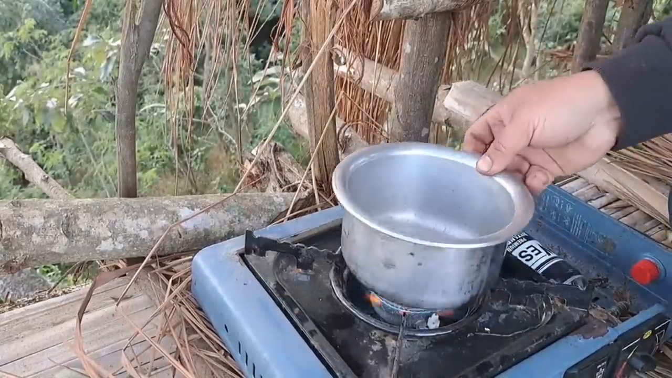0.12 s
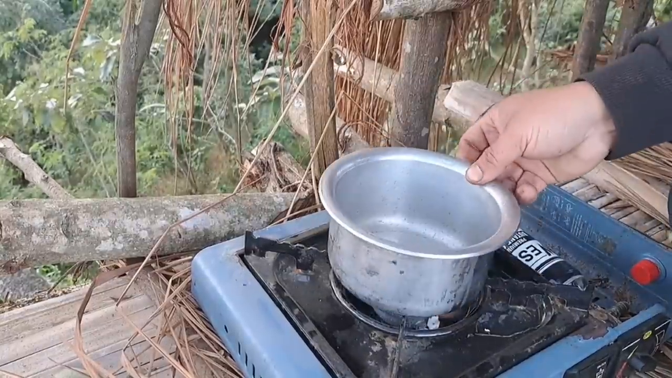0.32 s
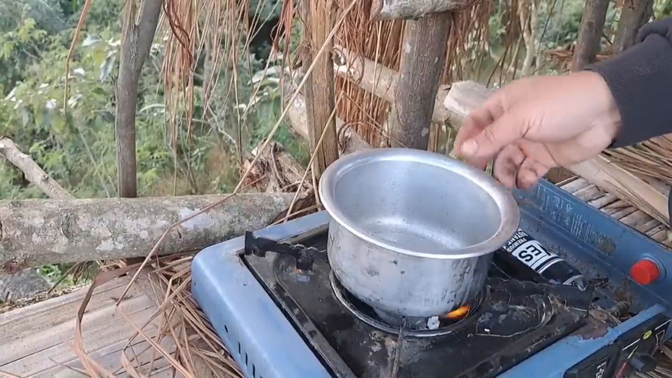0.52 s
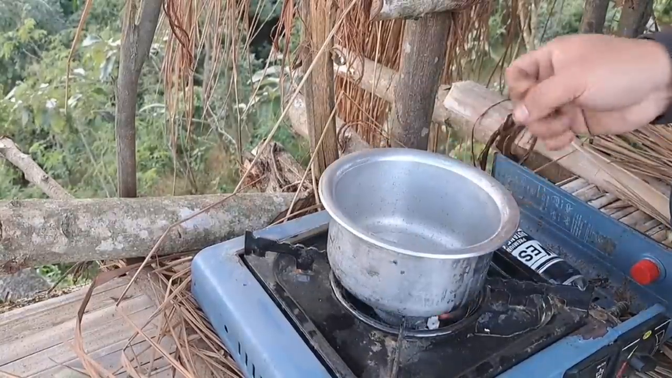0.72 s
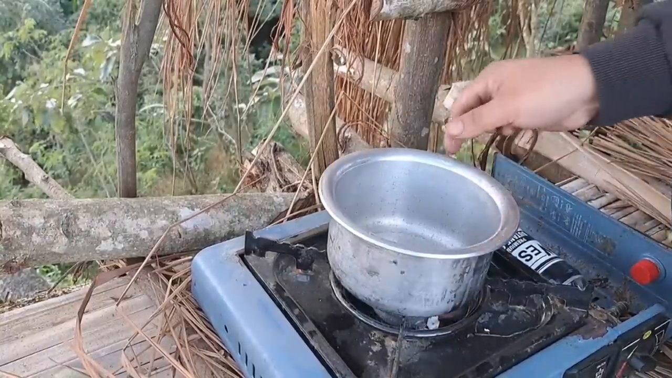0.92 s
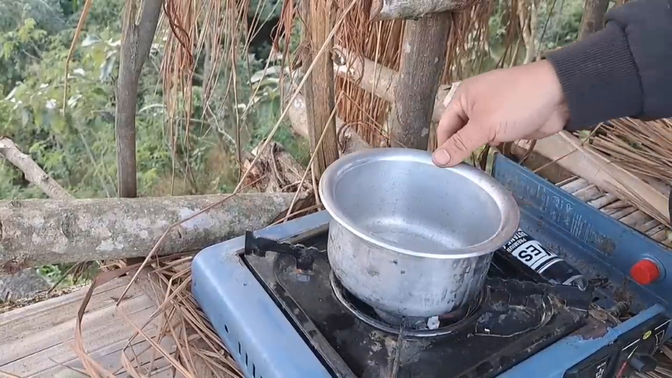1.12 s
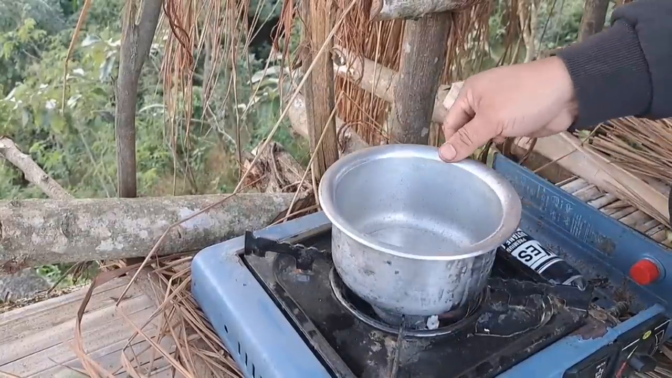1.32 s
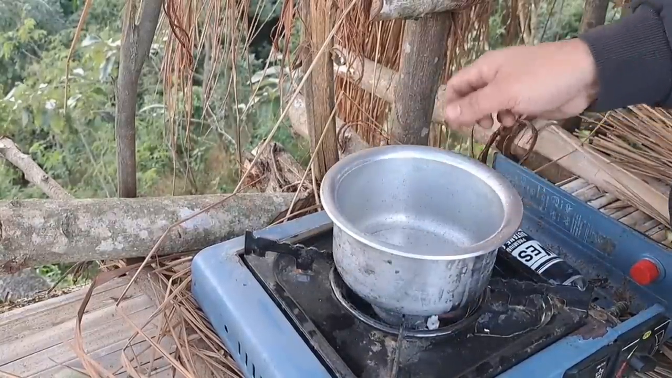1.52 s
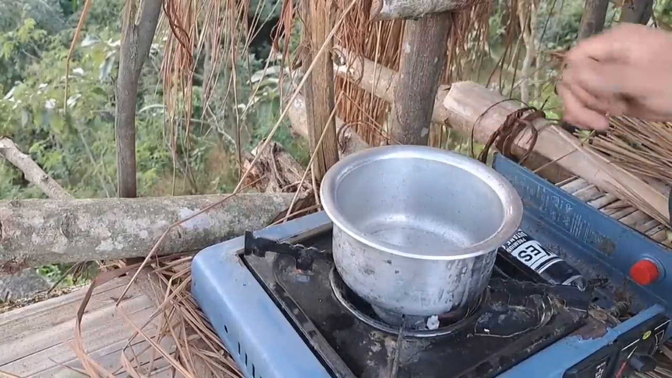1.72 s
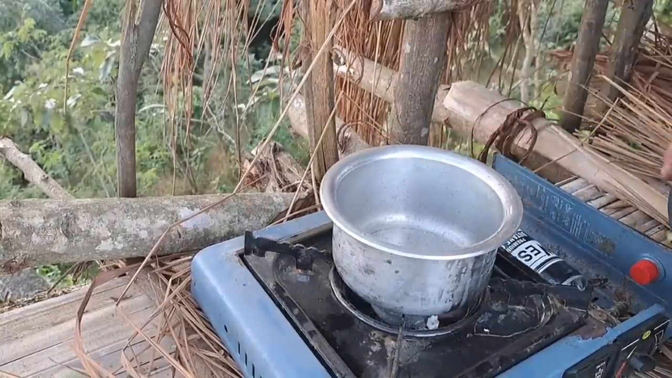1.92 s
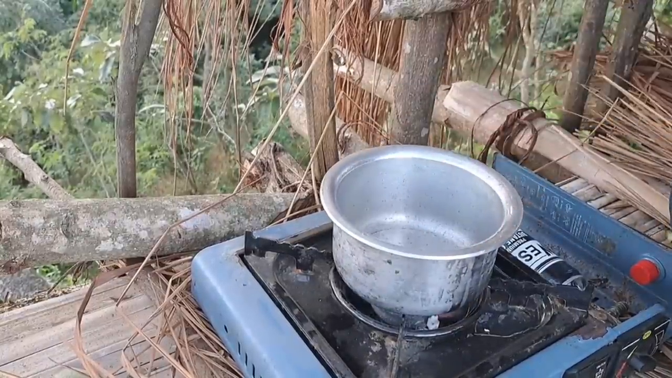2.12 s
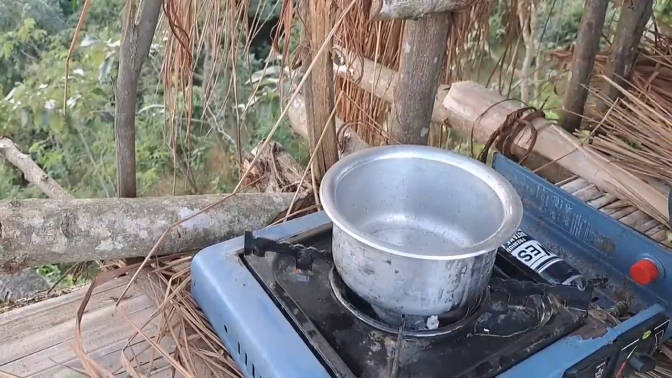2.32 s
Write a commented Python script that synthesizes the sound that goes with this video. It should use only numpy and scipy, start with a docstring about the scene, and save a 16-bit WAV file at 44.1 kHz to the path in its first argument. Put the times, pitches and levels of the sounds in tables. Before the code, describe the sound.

Thin metal pot clanks and scrapes on a gas stove grate over a low fluttering flame

```python
"""A lit gas stove flutters and hisses, then a thin aluminium pot clanks and scrapes on its grate close by.
The pot is nudged again and drops into its seat; a soft, airy rustle passes as the arm draws away.
Knocks ring decaying modes over bursts of coloured noise; scrapes are rough noise plus slips ringing the pot.
The flame is low noise and sputter under one flutter, the gas jet steady noise.
The rustle is swelling noise with thin arching whistles."""
import sys
import numpy as np
from scipy import signal
from scipy.fft import rfft, irfft
from scipy.io import wavfile
from scipy.ndimage import uniform_filter1d

SR = 44100
rng = np.random.default_rng(int(sys.argv[2]) if len(sys.argv) > 2 else 0)


def wrap_up_sound(samples):
    """Save the sound to the file named by the first command line argument, as 16-bit audio."""
    columns = np.atleast_2d(samples).T
    # keep every value between -1 and 1, then stretch to whole-number steps
    tamed = np.clip(columns, -1, 1)
    steps = np.round(tamed * 32767).astype(np.int16)
    wavfile.write(sys.argv[1], SR, steps)


N = 110250  # samples, 2.5 s


def undb(db):
    """Decibels to gain."""
    return 10 ** (np.asarray(db) / 20)


def unit(x):
    """Scale to rms 1."""
    return x / np.sqrt(np.mean(x ** 2))


def response(points):
    """Causal (minimum-phase) filter through (Hz, dB) points that keeps the power of white noise."""
    hz, db = np.array(points).T
    f = np.maximum(np.arange(N // 2 + 1) * SR / N, 1)
    gain = unit(undb(np.interp(np.log(f), np.log(hz), db)))
    # folding the cepstrum onto positive time makes the filter causal
    cepstrum = irfft(np.log(gain), N)
    cepstrum[1:N // 2] *= 2
    cepstrum[N // 2 + 1:] = 0
    return np.exp(rfft(cepstrum))


def colour(x, points):
    """Shape a sound's spectrum with the points."""
    return irfft(rfft(x) * response(points), N)


def pan(db):
    """Left and right gains for a left-minus-right level."""
    return undb(np.array([[db], [-db]]) / 2)


def noise(side_db):
    """Stereo white noise; side_db 0 makes the channels unrelated."""
    mid, side = rng.standard_normal((2, N))
    return mid + undb(side_db) * side * np.array([[1], [-1]])


def band_pass(low_high_hz):
    """Second-order Butterworth band."""
    return signal.butter(2, low_high_hz, "band", fs=SR, output="sos")


def walk(hz):
    """Smooth random motion with rms 1; higher hz moves faster."""
    k = max(int(SR / hz), 2)
    smooth = uniform_filter1d(rng.standard_normal(N), k)
    return unit(uniform_filter1d(smooth, k))


def curve(rows):
    """Gain along (s, dB) points."""
    s, db = np.array(rows).T
    return undb(np.interp(np.arange(N) / SR, s, db))


def fade(t, t60):
    """Free decay, falling 60 dB in t60 seconds."""
    return np.exp(-np.log(1000) * t / t60)


def add(out, x, s):
    """Mix x in from time s."""
    i = int(s * SR)
    n = min(x.shape[-1], N - i)
    out[..., i:i + n] += x[..., :n]


# Pot meets grate. Each row: start in seconds, level in dB, treble in dB, thud of the stove body in dB,
# seat from 0 tilted to 1 seated, chatter as the strength ratio of successive contacts (0-1),
# ring time as a share of the free ring. The dB are relative to the layer levels below.
POT_KNOCKS = [(.2127, -7, -3, 6.5, 0.74, 0.88, 0.9), (.229, -7, -1.5, 1, 0.7, 0.5, 0.85),
              (0.284, -22, -5, 1.5, 0.093, .7, 1.1), (0.3129, -14.5, -19.5, 2.5, 0.073, 0.87, 1.2),
              (.3358, -2, 1, -1, 0, 0.63, 0.43), (.341, -4, 4.5, -12, .2, .4, .65),
              (.3753, 1.5, -1.5, -0.5, 0.075, 1, 0.55), (.3826, -9, 6, 2, 0.36, .5, 1.2),
              (.4038, -4.5, -8, 10, 0, .6, 0.58), (.4100, -8, 1, -17, 0.17, 0.6, 0.85),
              (0.4183, -6, -7.5, 2, 0.49, 0.47, 0.48), (1.5114, -4.5, 0.5, -10.5, 1, 0.5, 0.73),
              (1.5158, -5.5, 4.5, -6, 1, .8, 0.85), (1.5311, -16, 8.5, 6, 0.64, 1, 1.06),
              (1.5394, -13, 1.5, -6, 1, 0.1, 0.37), (1.583, -11.5, -9.5, 1, 0.61, 0.6, 0.57)]
# Dense clatter of grate and stove top. Each row: frequency in Hz, relative level in dB per Hz.
CLATTER_COLOUR = [(150, -28), (400, -13.5), (720, -3.5), (950, -5), (1200, 0), (1500, -1), (2000, -3.5),
                  (2220, -11), (2650, -8), (3400, -14), (3900, -21), (4200, -15), (4700, -24),
                  (6500, -26.5), (8000, -27.5), (9200, -37.5), (12000, -29.5), (16000, -39)]
# Thud of the stove body. Each row: frequency in Hz, relative level in dB per Hz.
THUD_COLOUR = [(30, -16), (70, -6), (130, 0), (250, 5), (380, 6.5), (600, 0.5), (1000, -36), (3000, -57)]
RING_DB, CLATTER_DB, CRACK_DB, THUD_DB, SHIMMER_DB = -25.5, -22.5, -5.5, -38, -61.5
CLATTER_T60_S, SHIMMER_T60_S = 0.11, 0.14  # before each knock's ring share
THUD_T60_S, CHATTER_S = 0.16, 0.0035  # thud decay, mean gap between contacts
TREBLE_HZ = 3000  # where the treble tilt of knocks and ring turns over
POT_WIDTH_DB = -7.5  # side level of the clatter


def knocks():
    """Each blow chatters in four quick contacts, rings the pot, rattles the grate and thuds in the stove body."""
    t = np.arange(SR // 4) / SR
    ring, clatter, thud = np.zeros((3, 2, N))
    wall = shimmer(t)
    split = signal.butter(1, TREBLE_HZ, fs=SR, output="sos")
    for s, db, treble_db, thud_db, seat, chatter, share in POT_KNOCKS:
        add(ring, pot_ring(t, seat, treble_db, share) * undb(db + RING_DB), s)
        wall_ring = wall * fade(t, SHIMMER_T60_S * share)
        add(ring, wall_ring * undb(db + treble_db + SHIMMER_DB), s)

        rattle = noise(POT_WIDTH_DB)[:, :len(t)] * fade(t, CLATTER_T60_S * share) * undb(CLATTER_DB)
        # each contact is a one-sample crack, weaker by the chatter ratio every time
        for k, jitter in enumerate(rng.uniform(-1, 1, size=4)):
            contact_s = k * CHATTER_S * (1 + .06 * jitter)
            rattle[:, int(contact_s * SR)] -= undb(CRACK_DB) * chatter ** k
        low = signal.sosfilt(split, rattle)
        high = rattle - low
        add(clatter, undb(db) * (low + undb(treble_db) * high), s)

        boom = noise(-24)[:, :len(t)] * fade(t, THUD_T60_S)
        add(thud, boom * undb(db + thud_db + THUD_DB), s)
    return ring + colour(clatter, CLATTER_COLOUR) + colour(thud, THUD_COLOUR)


# Rings of the pot. Each row: frequency in Hz, level in dB when tilted, level in dB when seated,
# t60 in seconds of the free ring.
RING_MODES = [(678, -9, -13, .17), (790, -10, -6, .13), (845, -11, -18, .13), (1105, -4, -13, .15),
              (1200, -7, -5, .13), (1398, -6, -11, .13), (1438, -3, 1, .16), (1588, -2, -3, .16),
              (1642, -4, -14, .14), (1825, -4, -9, .15), (1887, -14, -4, .12), (2036, -3, -16, .15),
              (2090, -5, -5, .16), (2312, -16, -9, .1), (2400, -8, -14, .14), (2610, -14, -10, .13),
              (3040, -9, -16, .15), (3300, -13, -13, .16), (3520, -17, -6, .13), (3682, -17, -16, .13),
              (4150, -14, -20, .1), (5328, -24, -16, .16), (6530, -32, -22, .09), (6840, -32, -21, .08)]
RING_BUILD_S, MODE_WIDTH = 0.0015, 0.6  # onset t60, side gain of the modes


def pot_ring(t, seat, treble_db, share):
    """The pot's modes after a contact; seat sets their balance, share their decay, and high ones spread wider."""
    hz, tilted_db, seated_db, t60 = np.array(RING_MODES).T[:, :, None]
    tilt_db = treble_db * hz ** 2 / (hz ** 2 + TREBLE_HZ ** 2)
    gains = undb(tilted_db + seat * (seated_db - tilted_db) + tilt_db)
    opposite = (-1.) ** np.arange(len(hz))[:, None]  # neighbouring modes move in opposite senses
    swing = opposite * gains * fade(t, t60 * share)
    mid = (swing * np.sin(2 * np.pi * hz * t)).sum(0)
    side_phase = 2 * np.pi * (hz * t + rng.random(hz.shape))
    side = MODE_WIDTH * (swing * np.minimum(hz / TREBLE_HZ, 2) * np.sin(side_phase)).sum(0)
    return np.array([mid + side, mid - side]) * (1 - fade(t, RING_BUILD_S))


SHIMMER_HZ, SHIMMER_SPREAD_DB = (4200, 14530), 8.5  # range of the partials, spread of their levels


def shimmer(t, count=70):
    """Faint high partials of the thin wall, each with its own strength at either ear."""
    hz = rng.uniform(*SHIMMER_HZ, size=(count, 1))
    spread = undb(SHIMMER_SPREAD_DB * rng.standard_normal((2, count, 1)))
    gains = spread * SHIMMER_HZ[0] / hz
    phase = 2 * np.pi * (hz * t + rng.random((2, count, 1)))
    return (gains * np.sin(phase)).sum(1)


# The base slides on the grate. Each row: start in seconds, loudest moment in seconds, end in seconds,
# level in dB at the loudest moment.
GRATE_SCRAPES = [(0.237, 0.292, 0.344, -45.5), (0.445, 0.566, 0.62, -67.5), (1.3, 1.438, 2.14, -63),
                 (1.448, 1.476, 1.509, -50)]
# Grit of the rub. Each row: frequency in Hz, relative level in dB per Hz.
GRIT_COLOUR = [(300, -19.5), (700, 7), (1400, -1.5), (2400, -15), (3300, -2), (4000, -5), (5400, -9),
               (7500, -14), (9200, -22), (12500, -8.5), (16000, -20.5)]
SCRAPE_ROUGH_DB, SCRAPE_RING_DB, SLIPS_PER_S = 2, -6.5, 650


def scrapes():
    """The base sticks and slips over the grate: a gritty rub whose slips ring the pot."""
    t = np.arange(N) / SR
    push = np.zeros(N)
    for start, top, end, db in GRATE_SCRAPES:
        push += undb(db) * np.interp(t, [start, top, end], [0, 1, 0])
    rough = unit(undb(SCRAPE_ROUGH_DB * walk(350)))
    grit = colour(noise(-5) * push * rough, GRIT_COLOUR)

    happens = rng.random(N) < SLIPS_PER_S / SR
    slips = unit(happens * rng.standard_normal(N)) * push
    body = pot_ring(t[:SR // 4], seat=0, treble_db=8, share=.6)
    body = body / np.linalg.norm(body[0])
    rung = signal.fftconvolve(slips[None], body)[:, :N]
    return grit + undb(SCRAPE_RING_DB) * rung


# Dull bumps, taps and ticks of the pot and stove. Each row: start in seconds, level in dB, pitch in Hz,
# width in octaves, t60 in seconds.
LIGHT_TAPS = [(0.256, -43.5, 74.4, .6, 0.14), (0.505, -43.5, 955, 0.63, 0.077),
              (1.221, -53.5, 6540, 0.46, 0.029), (1.223, -51, 58, .7, 0.18), (1.232, -54, 956, 0.68, 0.14),
              (1.371, -52, 1094, 0.58, 0.14), (1.476, -44, 860, 2.1, 0.034), (1.626, -50, 73.3, .6, 0.17),
              (1.981, -49, 4670, .08, .04), (2.379, -38, 353, 0.78, 0.027), (2.377, -55, 1200, 0.31, 0.017)]


def taps():
    """Light touches: one short burst of band-limited noise each."""
    t, out = np.arange(N) / SR, np.zeros((2, N))
    for s, db, hz, octaves, t60 in LIGHT_TAPS:
        band = band_pass(hz * 2 ** (np.array([-.5, .5]) * octaves))
        burst = unit(signal.sosfilt(band, noise(-10)))
        envelope = fade(t, t60) * (1 - fade(t, 0.001))
        add(out, burst * envelope * undb(db), s)
    return out


# Strength of the flame. Each row: time in seconds, level in dB.
FLAME_STRENGTH = [(0, -64.5), (.13, -63.5), (.17, -52.5), (.45, -46.5), (.53, -52.5), (.63, -57.5),
                  (.68, -54), (1.1, -51.5), (1.35, -54), (1.6, -50.5), (1.72, -56.5), (1.85, -53.5),
                  (2.12, -51), (2.21, -54.5), (2.3, -50), (2.5, -57)]
# Low roar of the flame. Each row: frequency in Hz, relative level in dB per Hz.
ROAR_COLOUR = [(25, -34.5), (50, -12.5), (90, -12), (140, 0.5), (250, 1), (350, -4.5), (560, -5.5),
               (670, -13.5), (790, -45.5), (2000, -40)]
# Faint sputter of the flame. Each row: frequency in Hz, relative level in dB per Hz.
SPUTTER_COLOUR = [(500, -17.5), (800, -5), (1000, -2), (1450, 0), (2200, -13), (2700, -6.5), (3300, -3),
                  (3900, -20.5), (5000, -16), (9000, -19.5)]
FLUTTER_HZ, FLUTTER_DB = (22.6, 160), 2.5  # flutter band, its depth on the roar
SPUTTER_DB, SPUTTER_FLUTTER_DB, SPUTTER_WANDER_DB = -17.5, 4, 3  # level, flutter depth, wander depth
FULL_FLAME_DB = -48  # strength at which the brightening gains are 1
BRIGHTEN, SPUTTER_BRIGHTEN = 0.35, 0.25  # exponents of strength for upper roar and sputter
RUMBLE_HZ, ROAR_SIDE_DB, ROAR_PAN_DB = 313, -14.5, -0.5


def flame():
    """The flame roars low and sputters with the same flutter, brighter as it grows."""
    flutter = unit(signal.sosfilt(band_pass(FLUTTER_HZ), rng.standard_normal(N)))
    strength = curve(FLAME_STRENGTH)
    fullness = strength / undb(FULL_FLAME_DB)

    roar = colour(noise(ROAR_SIDE_DB) * unit(undb(FLUTTER_DB * flutter)), ROAR_COLOUR)
    rumble = signal.sosfiltfilt(signal.butter(2, RUMBLE_HZ, fs=SR, output="sos"), roar)
    upper_roar = fullness ** BRIGHTEN * (roar - rumble)

    flicker = unit(undb(SPUTTER_FLUTTER_DB * flutter + SPUTTER_WANDER_DB * walk(23.8)))
    sputter = colour(noise(-4) * flicker, SPUTTER_COLOUR) * undb(SPUTTER_DB)
    sputter = fullness ** SPUTTER_BRIGHTEN * sputter
    return strength * (rumble + upper_roar + sputter) * pan(ROAR_PAN_DB)


# Gas jet in the mixing tube. Each row: frequency in Hz, relative level in dB per Hz.
JET_COLOUR = [(1500, -7), (2400, -13.5), (3200, -15.5), (3900, -23), (4700, 2.5), (5100, -4), (5500, 6.5),
              (6100, -12.5), (6900, -4.5), (7350, 5), (7800, -7.5), (9500, -18), (12500, -7.5),
              (16000, -15.5)]
JET_DB, JET_PAN_DB = -74.5, -7


def gas_jet():
    """Gas rushing through the mixing tube hisses evenly, as steady coloured noise."""
    return colour(noise(0), JET_COLOUR) * undb(JET_DB) * pan(JET_PAN_DB)


# Swell of the airy rustle. Each row: time in seconds, level in dB.
RUSTLE_LEVEL = [(0, -86), (.62, -87), (.85, -79), (1.05, -84), (1.78, -81), (1.86, -72.5), (1.97, -60),
                (2.14, -60.5), (2.22, -68.5), (2.29, -62.5), (2.4, -68.5), (2.5, -74)]
# Spectrum of the rustle. Each row: frequency in Hz, relative level in dB per Hz.
AIR_COLOUR = [(700, -16.5), (1500, 2), (2500, -6), (4000, -4.5), (4800, -1), (7200, -2), (9000, -9.5),
              (12800, -0.5), (16000, -9.5)]
# Thin whistles that rise and fall within the rustle. Each row: start in seconds, length in seconds,
# top pitch in Hz, level in dB.
THIN_WHISTLES = [(.7, 0.2, 13860, -80.5), (.74, 0.23, 11500, -82), (2.208, .28, 14400, -69),
                 (2.22, 0.31, 12900, -73.5), (2.249, .25, 12170, -74)]
WHISTLE_ARC, WHISTLE_WIDTH_HZ = 0.14, 450  # share of pitch lost at both ends, blur rate
WHISTLE_FLICKER_DB, RUSTLE_FLICKER_DB, RUSTLE_PAN_DB = 6, 1, -6


def rustle():
    """An airy swell, perhaps a sleeve, with thin noise-blurred whistles arching through it."""
    flicker = undb(RUSTLE_FLICKER_DB * walk(60))
    out = colour(noise(0), AIR_COLOUR) * curve(RUSTLE_LEVEL) * flicker
    for s, length, hz, db in THIN_WHISTLES:
        u = np.linspace(-1, 1, int(length * SR))
        phase = 2 * np.pi * np.cumsum(hz * (1 - WHISTLE_ARC * u ** 2)) / SR
        blur = np.array([walk(WHISTLE_WIDTH_HZ)[:len(u)] for _ in range(2)])
        blur = blur * unit(undb(WHISTLE_FLICKER_DB * walk(40)))[:len(u)]
        swell = np.sqrt(2 * (1 - u ** 2))
        add(out, blur * np.sin(phase) * swell * undb(db), s)
    return out * pan(RUSTLE_PAN_DB)


POT_PAN_DB, POT_LAG_S = -3, .00003


def scene():
    """The pot stands a little to the right, so the left hears it later and softer; flame, jet and rustle join."""
    hz = np.arange(N // 2 + 1) * SR / N
    late = np.exp(-2j * np.pi * hz * np.array([[POT_LAG_S], [0]]))
    pot = irfft(rfft(knocks() + scrapes() + taps()) * late, N) * pan(POT_PAN_DB)
    return pot + flame() + gas_jet() + rustle()


TOP_HZ = 15700


def record(dry):
    """The recorder cuts the top with a steep low-pass."""
    return signal.sosfilt(signal.ellip(10, .2, 70, TOP_HZ, fs=SR, output="sos"), dry)


dry = scene()
out = record(dry)
wrap_up_sound(out)
```